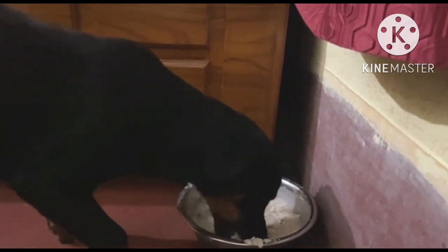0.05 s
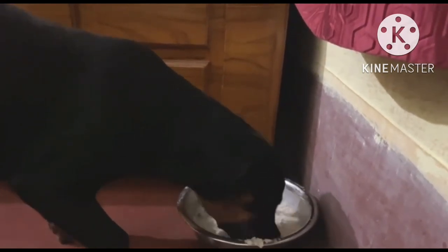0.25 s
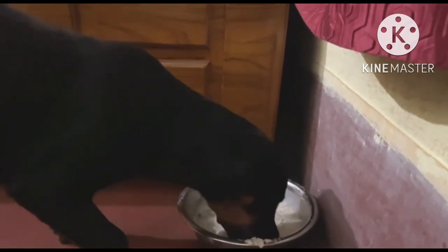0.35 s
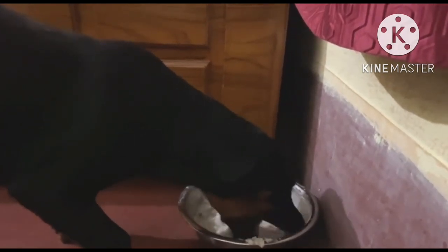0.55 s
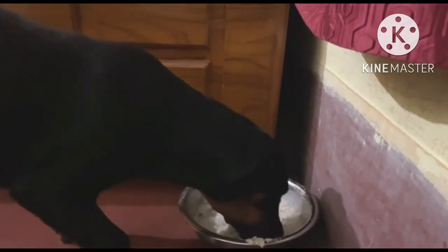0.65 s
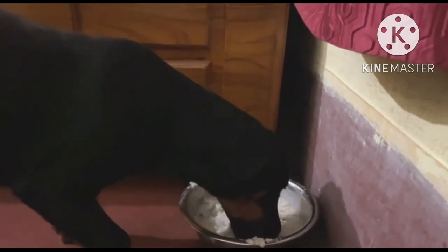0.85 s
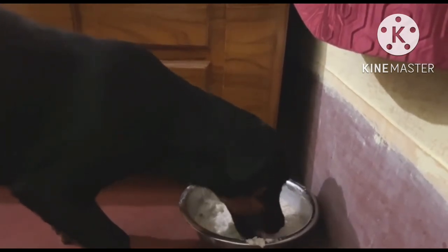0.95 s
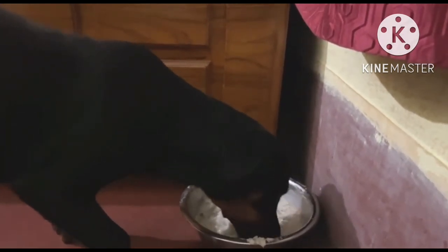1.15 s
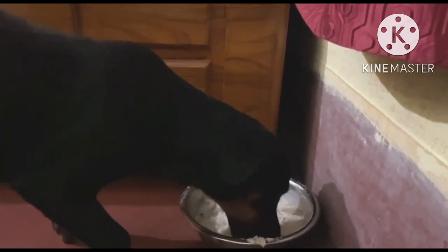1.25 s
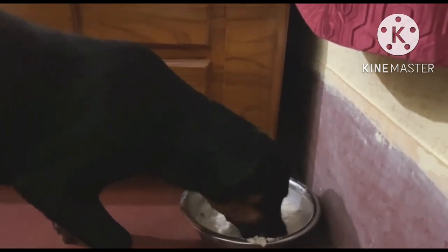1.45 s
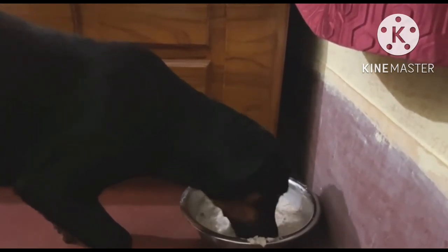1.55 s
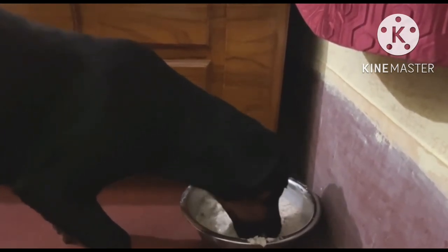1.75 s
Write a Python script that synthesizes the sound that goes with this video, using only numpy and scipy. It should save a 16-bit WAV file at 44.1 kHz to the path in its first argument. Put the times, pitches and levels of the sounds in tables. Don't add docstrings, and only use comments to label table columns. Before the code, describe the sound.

Wet dog eating: sticky smacks and squelches, with dull bowl knocks in a small bare room

```python
import sys
import numpy as np
from scipy import signal
from scipy.fft import rfft, irfft, next_fast_len
from scipy.io import wavfile
from scipy.ndimage import uniform_filter1d, map_coordinates

SR = 44100
rng = np.random.default_rng(int(sys.argv[2]) if len(sys.argv) > 2 else 0)


def generate_wav(signal):
    frames = np.transpose(np.atleast_2d(signal))
    scaled = np.clip(frames, -1, 1) * 32767
    pcm = np.round(scaled).astype(np.int16)
    wavfile.write(sys.argv[1], SR, pcm)


def voltage_ratio(level):
    return 10 ** (np.asarray(level, float) / 20)


N = 79380

# frequency in Hz, level in dB per Hz.
HOUSE_SPECTRUM = [(15, -11), (25, 3), (82, 0.5), (291, -15.5), (615, -20.5), (3380, -23), (7940, -44.5),
                  (10000, -43.5), (12000, -43.5), (15600, -87.5), (22000, -120)]
# time in seconds, level in dB.
HOUSE_SWELL = [(0.0, -47), (0.06, -53), (0.334, -52.5), (0.469, -49.5), (0.737, -49.5), (0.926, -53),
               (1.222, -59), (1.538, -57.5), (1.8, -55)]
# frequency in Hz, correlation from -1 to 1.
PORT_LIKENESS = [(60, .99), (270, .92), (570, 0), (1300, -.1), (5400, .1), (7000, -.6), (8200, -.9),
                 (10200, .85)]
# start in seconds, length in seconds, level in dB,
# mouth pitch in Hz, fizz against bubbles in dB.
TONGUE_SQUELCHES = [(-0.06, 0.22, -64.5, 2210, -11.5), (0.107, 0.058, -43, 1780, -3),
                    (0.143, 0.031, -49, 1290, -0.5), (0.228, 0.012, -44, 1560, 1),
                    (0.471, 0.04, -46, 2170, 0.5), (0.502, 0.031, -45, 900, -12.5),
                    (0.581, 0.029, -35.5, 2100, -3.5), (0.592, 0.042, -45, 1580, -5.5),
                    (0.78, 0.046, -70.5, 2850, 7.5), (0.918, 0.053, -57, 2000, -5.5),
                    (0.945, 0.047, -43, 1510, -8), (0.965, 0.13, -66.5, 1000, 2.5),
                    (1.06, 0.036, -42.5, 1255, -5.5), (1.2, 0.014, -60.5, 3700, -4),
                    (1.292, 0.058, -51, 1555, -13), (1.318, 0.043, -42.5, 1255, -8),
                    (1.407, 0.11, -52.5, 1680, -2.5), (1.53, 0.059, -63.5, 1180, -8.5),
                    (1.615, 0.18, -77, 2530, 8), (1.777, 0.047, -58, 3050, -7.5)]
# start in seconds, length in seconds, level in dB.
BOWL_ROCKS = [
    (0.01, 0.079, -59),
    (0.124, 0.036, -42.5),
    (0.234, 0.17, -48),
    (0.54, 0.096, -52),
    (0.624, 0.13, -43),
    (1.071, 0.092, -46),
    (1.438, 0.13, -52),
]
# frequency in Hz, level in dB, 60 dB decay in seconds.
BOWL_MODES = [(123.5, -5.5, 0.071), (203, 3, 0.028), (270, 3, 0.043), (393.6, 4, 0.021), (460, 1.5, 0.02)]
# time in seconds, peak in dB.
SALIVA_TICKS = [(.064, -63), (.083, -55), (.1492, -34), (.2349, -24), (.2436, -20.5), (.4795, -37),
                (.5968, -17.5), (.779, -58), (.7888, -46), (.806, -54), (.820, -39.5), (.839, -58.5),
                (.9093, -49), (.926, -60), (.930, -46.5), (.9495, -46.5), (1.065, -56), (1.0748, -36),
                (1.2045, -53), (1.222, -63), (1.293, -53.5), (1.311, -48), (1.3365, -52), (1.3575, -33.5),
                (1.4325, -39.5), (1.499, -45), (1.6345, -41), (1.666, -52)]
# time in seconds, push in dB, blow length in milliseconds.
MUZZLE_KNOCKS = [
    (.124, -36.5, 0.4),
    (0.238, -15.5, 2.6),
    (0.2437, -23, 0.92),
    (0.479, -40, 2.9),
    (0.5969, -22, 0.66),
    (0.934, -37.5, 1.9),
    (1.0675, -33.5, 1.7),
    (1.0711, -20.5, 2.58),
    (1.326, -42, 1.7),
    (1.4319, -46, 1.7),
]
# time in seconds, peak in dB, #
# pitch in Hz, cycles of ring.
SMACKS_AND_RING = [(0.127, -40.5, 1648, 14), (0.1479, -26, 2680, 9.9), (.2455, -30.5, 2543, 40),
                   (0.237, -22.5, 1498, 5.2), (.2442, -7.5, 2500, 3.2), (.2443, -9, 3400, 4),
                   (.4918, -24.5, 428, 2.95), (.493, -27.5, 760, 1.77), (.4995, -45, 293, 6),
                   (0.5072, -34.5, 810, 1.9), (.501, -26.5, 2120, 0.96), (0.532, -41, 3500, 9.1),
                   (0.598, -15.5, 1726, 1.73), (.599, -27, 3500, 8.9), (0.611, -33, 1880, 9),
                   (.624, -33, 1890, 6.9), (0.959, -38.5, 1630, 9.4), (1.066, -30, 4140, 2.9),
                   (1.071, -48.5, 1180, 1.8), (1.327, -33, 590, 2.1), (1.329, -36, 1454, 2.2),
                   (1.337, -35, 3040, 5.8), (1.351, -43, 2950, 4), (1.333, -36, 1070, 9),
                   (1.351, -62, 1194, 2), (1.4329, -41.5, 1710, 3.6), (1.434, -39.5, 3390, 9.5),
                   (1.444, -48, 1600, 10.3), (1.476, -37.5, 3340, 4.3), (1.504, -48, 1590, 5.5)]
# time in seconds, peak in dB, pitch in Hz,
# cycles of ring.
BASE_BUMPS = [(0.631, -27, 150, 1.4), (.631, -27, 283, 2.3), (.644, -31.5, 200, 2.5), (.649, -33.5, 169, 1),
              (.656, -31.5, 148, 1.3), (.668, -34, 240, 1), (.664, -36, 123, 2.6), (.676, -32, 270, 2.3),
              (.677, -35.5, 491, 7.3), (0.6859, -26.5, 247, 2.7), (.703, -30, 270, 1.77),
              (.711, -40, 270, 2.3), (.73, -39, 475, 2.8), (1.4325, -34.5, 401, 4.15),
              (1.437, -28.5, 215, 1.1), (1.452, -39, 226, 3.3), (1.486, -37.5, 178.6, 2.2),
              (1.479, -51, 408, 2.8), (1.518, -46, 289, 6.3), (1.533, -39.5, 110, 1.86),
              (1.552, -46, 113, 1.8), (1.553, -52.5, 284, 3)]
# delay in milliseconds, left level in dB, right level in dB.
NEAR_ECHOES = [(1.75, -3, -5), (3.2, -12, -9), (5.2, -14, -13), (17.2, -19, -18), (18.3, -10, -11),
               (20.6, -17, -16)]
# frequency in Hz, 60 dB decay in seconds.
ROOM_DECAY = [(100, 0.33), (400, 0.56), (1700, 0.31), (2600, 0.41), (3600, 0.35), (6000, 0.44),
              (11000, 0.24)]
# frequency in Hz, gain in dB.
ROOM_SEND_COLOUR = [(300, -5.5), (700, -0.5), (1100, 0.5), (1600, 2), (2500, -0.5), (3600, -7.5), (5000, 4),
                    (9000, -5.5)]
# frequency in Hz, gain in dB.
MIC_COLOUR = [(4250, 1.5), (4600, -7), (5200, -3), (6400, -3.5), (8000, 1), (9300, 0), (10500, 0),
              (11600, -5)]


def unit(x):
    return x / np.sqrt(np.mean(x ** 2) + 1e-20)


def along(points, hz):
    f, value = np.transpose(points)
    return np.interp(np.log(hz + 1), np.log(f + 1), value)


def filtered(x, response):
    size = next_fast_len(x.shape[-1] + 8192)
    spectrum = rfft(x, size) * response(np.fft.rfftfreq(size, 1 / SR))
    return irfft(spectrum, size)[..., :x.shape[-1]]


def port_noise(count):
    def mid_side(hz):
        angle = np.arccos(np.clip(along(PORT_LIKENESS, hz), -1, 1)) / 2
        return np.array([np.cos(angle), np.sin(angle)])

    mid, side = filtered(rng.standard_normal((2, count)), mid_side)
    return np.array([mid + side, mid - side])


def gesture(start, length):
    rise_share = 0.33
    u = (np.arange(N) / SR - start) / length
    return np.clip(np.minimum(u / rise_share, (1 - u) / (1 - rise_share)), 0, 1)


def pops(times, size, hz, cycles, count):
    rise = 3
    t = np.arange(count) / SR
    u = t * (hz / cycles)[:, None]
    envelope = (rise * u * np.exp(1 - rise * u)) ** 1.8
    rings = size[:, None] * np.sin(2 * np.pi * hz[:, None] * t) * envelope
    at = np.round(times * SR).astype(int)[:, None] + np.arange(count)
    return np.bincount(at.ravel(), rings.ravel(), N + SR)[:N]


def bursts(events, t60):
    out, t = np.zeros(N + SR), np.arange(400) / SR
    attack = 1 - np.exp(-t / 0.0005)
    for at, level_db in events:
        burst = voltage_ratio(level_db - 60 * t / t60) * attack * rng.standard_normal(len(t))
        out[round(at * SR):][:len(t)] += burst
    return filtered(out[:N], lambda f: (1j * f / (3900 + 1j * f)) ** 2)


def house():
    def shaped(keep):
        return unit(filtered(port_noise(N), lambda f: voltage_ratio(along(HOUSE_SPECTRUM, f)) * keep(f)))

    hiss_db, lumps_per_s = -70, 25
    t = np.arange(N) / SR
    times, db = np.transpose(HOUSE_SWELL)
    lumps = map_coordinates(rng.standard_normal(60), [t * lumps_per_s])
    level = voltage_ratio(np.interp(t, times, db) + 2.0 + 0.29 * lumps)
    rumble = level * shaped(lambda f: 1 / (1 + (f / 400) ** 4))
    return rumble + voltage_ratio(hiss_db) * shaped(lambda f: 1 / (1 + (400 / (f + 1)) ** 4))


def squelches():
    count, spread_db, pitch_spread, ring_cycles, fizz_hz = 4000, 9, 0.31, 1.74, 4760
    times = rng.uniform(0, N / SR, count)
    size_draw, pitch_draw, sign_draw = rng.standard_normal((3, count))
    size = voltage_ratio(spread_db * size_draw) * np.sign(sign_draw)
    fizz = unit(filtered(rng.standard_normal(N), lambda f: f / (1 + (f / fizz_hz) ** 2)))
    fizz = fizz * voltage_ratio(3.1 * unit(uniform_filter1d(rng.standard_normal(N), size=60)))
    out = np.zeros(N)
    for start, length, db, hz, fizz_db in TONGUE_SQUELCHES:
        on = (times > start - 0.005) & (times < start + length)
        pitch = hz * np.exp(pitch_spread * pitch_draw[on])
        bubbles = pops(times[on], size[on], pitch, ring_cycles, count=300)
        shape = gesture(start, length)
        bubbles = bubbles / np.sqrt(np.mean(bubbles[shape > 0] ** 2) + 1e-20)
        out += voltage_ratio(db) * shape * (bubbles + voltage_ratio(fizz_db) * fizz)
    return out


def bowl_ring():
    rise_ms, low_hz = 2.48, 90
    t = np.arange(SR // 5) / SR
    ring = sum(voltage_ratio(db - 60 * t / t60) * np.sin(2 * np.pi * hz * t) for hz, db, t60 in BOWL_MODES)
    ring = ring * (1 - np.exp(-t * 1000 / rise_ms))
    return filtered(ring, lambda f: (1j * f / (low_hz + 1j * f)) ** 2)


def rocking(ring):
    contacts_per_s, jitter = 150, 0.5
    t = np.arange(len(ring)) / SR
    turns = np.arange(N / SR * contacts_per_s)
    turns = turns + jitter * rng.uniform(size=len(turns))
    at = np.clip(turns * SR / contacts_per_s, 0, N - 1).astype(int)
    contacts = np.bincount(at, voltage_ratio(2.5 * rng.standard_normal(len(at))), N)
    contacts = uniform_filter1d(contacts, size=40)
    rattle = unit(signal.fftconvolve(contacts, ring * voltage_ratio(-60 * t / 0.29))[:N])
    return rattle * sum(voltage_ratio(db) * gesture(start, length) for start, length, db in BOWL_ROCKS)


def ticks():
    return bursts(SALIVA_TICKS, t60=0.013)


def knocks(ring):
    force, t = np.zeros(N + SR), np.arange(500) / SR
    for at, db, ms in MUZZLE_KNOCKS:
        blow = np.sin(np.pi * np.clip(t * 1000 / ms, 0, 1)) ** 2
        force[round(at * SR):][:len(t)] += voltage_ratio(db) * blow / (ms * SR / 2000)
    return signal.fftconvolve(force, ring)[:N]


def smacks():
    splash_db = -17
    times, db, hz, cycles = np.transpose(SMACKS_AND_RING)
    return pops(times, voltage_ratio(db), hz, cycles, count=900) + bursts(zip(times, db + splash_db), t60=0.025)


def bumps():
    times, db, hz, cycles = np.transpose(BASE_BUMPS)
    return pops(times, voltage_ratio(db), hz, cycles, count=2500)


def near(x):
    def late(f, ms):
        return np.exp(-2j * np.pi * f * ms / 1000)

    def paths(f):
        low_hz, high_hz, left_db, lag_ms = 680, 3500, 0.7, 0.19
        dull = 1j * f / (low_hz + 1j * f) / (1 + 1j * f / high_hz)
        left = 1 + dull * sum(voltage_ratio(left) * late(f, ms) for ms, left, right in NEAR_ECHOES)
        right = late(f, lag_ms) + dull * sum(voltage_ratio(right) * late(f, ms) for ms, left, right in NEAR_ECHOES)
        return np.array([voltage_ratio(left_db) * left, voltage_ratio(-left_db) * right])

    return filtered(x, paths)


def room(x):
    gap_ms = 1.5
    out, step = np.zeros((2, N + 2 * SR)), SR // 8
    for i in range(0, N, step):
        hz, t, z = signal.stft(port_noise(SR // 2), SR, nperseg=256)
        decay = voltage_ratio(-60 * t / along(ROOM_DECAY, hz)[:, None])
        tail = signal.istft(z * decay, SR, nperseg=256)[1]
        tail = tail * np.clip(np.arange(tail.shape[1]) / (SR * gap_ms / 1000), 0, 1) ** 2
        wet = signal.fftconvolve(x[None, i:i + step], tail / np.linalg.norm(tail[0]), axes=1)
        out[:, i:i + wet.shape[1]] += wet
    return out[:, :N]


def scene():
    tick_send_db, bowl_send_db = -8, -8
    background = house()
    ring = bowl_ring()
    mouth = squelches() + smacks()
    saliva = ticks()
    steel = rocking(ring) + knocks(ring) + bumps()
    sent = filtered(mouth + voltage_ratio(tick_send_db) * saliva, lambda f: voltage_ratio(along(ROOM_SEND_COLOUR, f)))
    return near(mouth + saliva) + steel + room(sent + voltage_ratio(bowl_send_db) * steel) + background


def low_pass(x):
    return signal.sosfilt(signal.butter(12, 12180, fs=SR, output="sos"), x)


def record(dry):
    low_hz, top_hz, ceiling = 49.3, 12000, 0.97

    def microphone(hz):
        return voltage_ratio(along(MIC_COLOUR, hz)) * (hz < top_hz) / (1 + (low_hz / (hz + 1)) ** 6)

    x = filtered(dry, microphone)
    mix = x / (1 + np.abs(x / ceiling) ** 6) ** (1 / 6)
    return low_pass(mix)


dry = scene()
out = record(dry)
generate_wav(out)
```